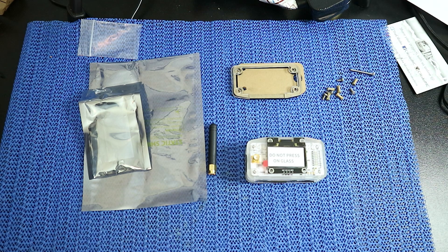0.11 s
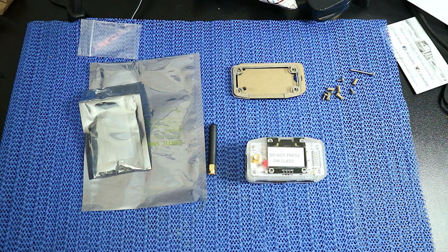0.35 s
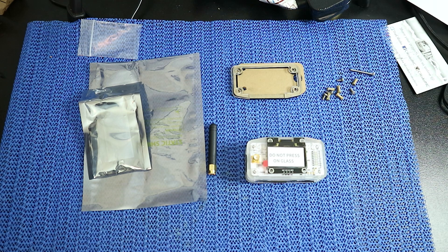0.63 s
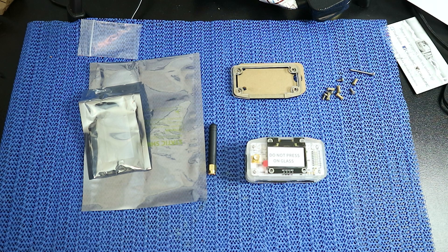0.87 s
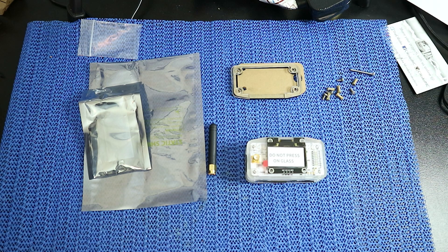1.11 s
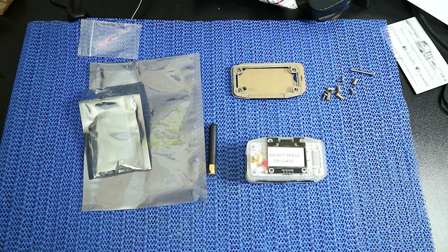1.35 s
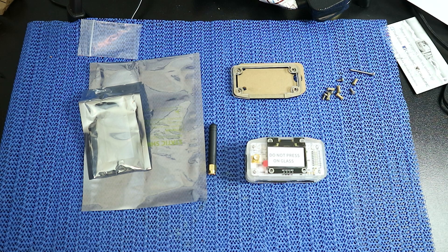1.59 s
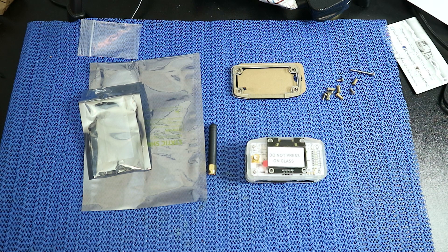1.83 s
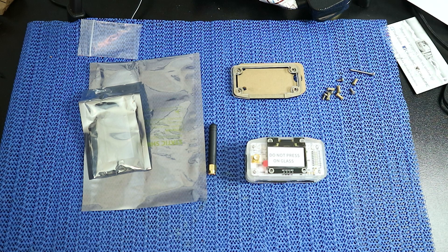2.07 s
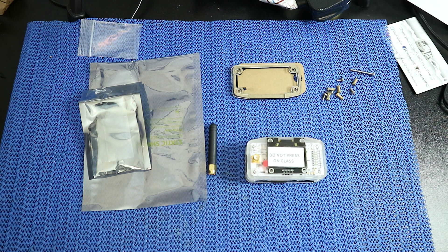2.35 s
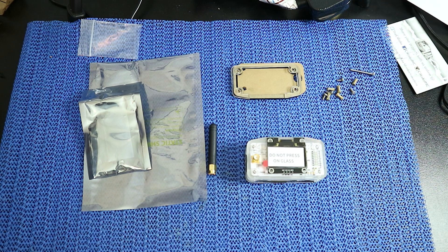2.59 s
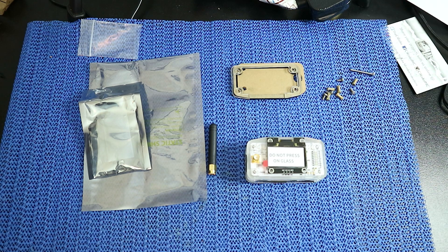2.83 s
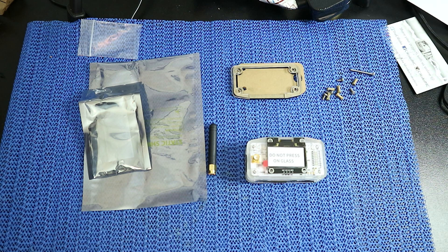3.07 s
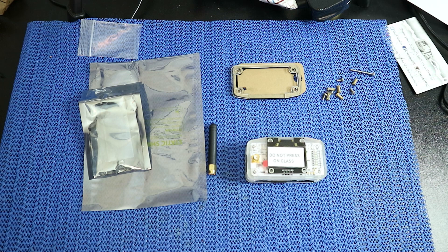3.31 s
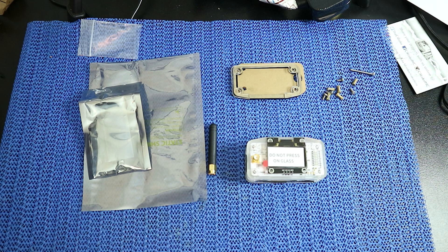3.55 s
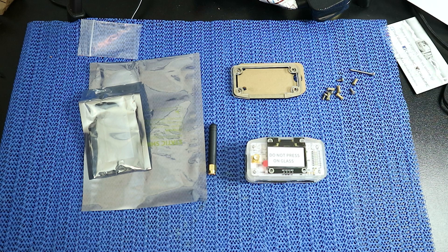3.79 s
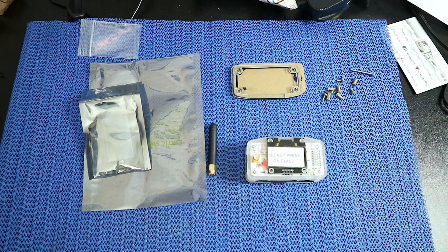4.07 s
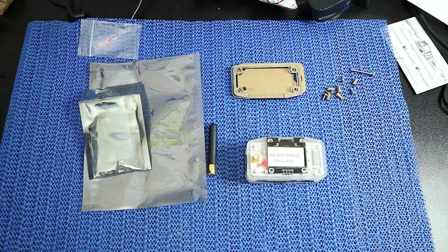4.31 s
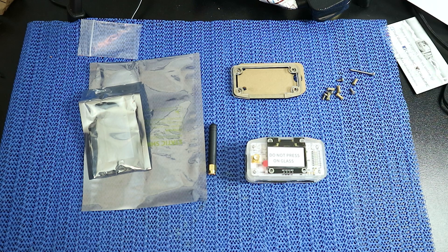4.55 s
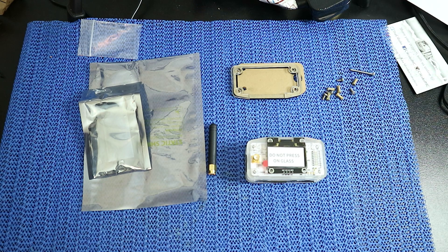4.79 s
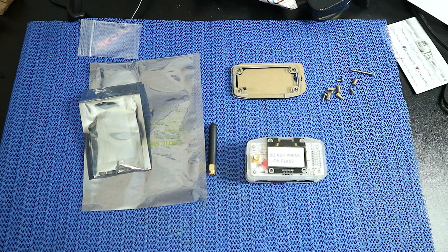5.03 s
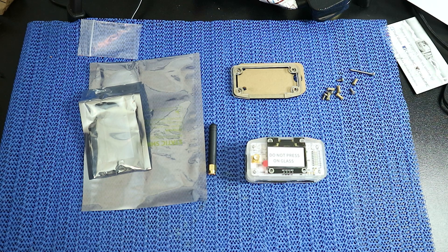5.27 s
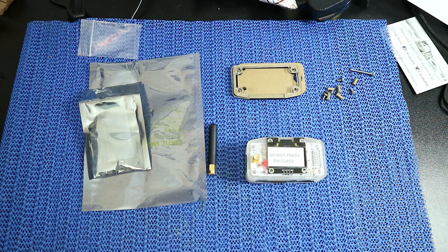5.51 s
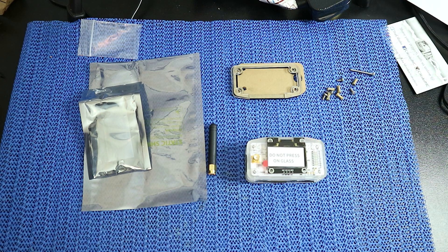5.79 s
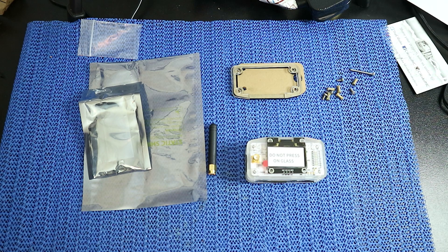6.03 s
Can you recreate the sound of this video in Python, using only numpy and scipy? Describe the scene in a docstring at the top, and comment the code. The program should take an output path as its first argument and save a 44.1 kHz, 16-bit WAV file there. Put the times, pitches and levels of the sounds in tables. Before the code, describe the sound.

Busy rummaging through hard tools and small metal parts, clattering for two seconds, nearly pausing, then knocking and rattling again in a small room.

```python
"""A hand rummages through a drawer of tools a couple of metres away in a small, furnished room.
From the start, mains hum, low rumble and hiss lie under two seconds of busy knocks, ticks and rattle.
Then come faint knocks, and from about 3.5 s the rummaging returns, with a short lull after 4 s, to the end.
Bursts of tiny contacts ring the drawer's modes, and each knock adds a short sine note from the tool.
Decaying noise makes the room's echoes, which blur every blow."""
import sys
import numpy as np
from scipy import signal
from scipy.fft import rfft, irfft, next_fast_len
from scipy.io import wavfile
from scipy.ndimage import uniform_filter1d

SR = 44100
rng = np.random.default_rng(int(sys.argv[2]) if len(sys.argv) > 2 else 0)


def level_to_linear(level):
    """Convert decibel levels to linear amplitude factors, elementwise."""
    exponent = np.asarray(level, float) / 20
    return 10 ** exponent


def transcribe(u):
    """Save the signal u as a 16-bit wav file named by the first command-line argument.

    u: samples, shape (n,) or (channels, n), limited to [-1, 1]; the rate is SR.
    q: integer samples, one column per channel.
    """
    v = np.clip(np.atleast_2d(u).T, -1, 1)
    q = np.round(v * 32767).astype(np.int16)
    wavfile.write(sys.argv[1], SR, q)


N = 270942  # length in samples
SIZE = next_fast_len(N + SR)  # transform length, with room for the tails
HZ = np.arange(SIZE // 2 + 1) * SR / SIZE + 0.00098  # just above zero, so its logarithm exists
TIME = np.arange(N) / SR

# How hard the hand stirs the small parts: start_s [s], stir_db [relative dB]
STIR = [(0.0, -26), (0.22, -59.5), (0.45, -28.5), (0.9, -32.5), (1.18, -41.5), (1.45, -21.5), (1.7, -32),
        (2.0, -39.5), (2.2, -63), (3.44, -78), (3.52, -42.5), (3.95, -41.5), (4.2, -64), (4.46, -24.5),
        (4.86, -58), (5.2, -22), (5.38, -41.5), (5.54, -32), (5.73, -35.5), (6.0, -46), (6.14, -36)]
# The knocks: start_s [s], blow_db [relative dB], thud_db and edge_db [dB relative to the blow],
# pitch_hz of the struck tool [Hz]
KNOCKS = [(0.037, -29, -1, -5.5, 1130), (0.091, -26, -25, -12, 994), (0.122, -28, 0.5, -9.5, 734),
          (0.141, -26.5, -4.5, -6.5, 972), (0.281, -17.5, -10, -3.5, 1210), (0.334, -12.5, -18, -6.5, 2190),
          (0.344, -15.5, -34, -23, 942), (0.469, -17.5, -6.5, -8, 950), (0.488, -21.5, -18, -10, 970),
          (0.551, -14.5, -7, -5.5, 1394), (0.589, -21, -7, -4, 1940), (0.623, -22, -9, -14, 1205),
          (0.653, -6.5, -19, -8.5, 860), (0.665, -14, -43, -6, 790), (0.788, -18.5, -8.5, -7, 1780),
          (0.82, -15.5, -42, -9, 890), (0.883, -14, -8, -6, 887), (0.919, -25, -19, -35, 932),
          (0.984, -28, -25, -21, 1130), (1.038, -29, -34, -4, 1130), (1.143, -35, -10, -17, 700),
          (1.187, -32.5, -9, -5.5, 664), (1.226, -28, -2.5, 1, 1144), (1.25, -19, -4, -4, 1120),
          (1.312, -27, -13.5, -11.5, 970), (1.336, -21, -12, -11, 960), (1.379, -17.5, -9, -10.5, 950),
          (1.41, -12.5, -10, -3.5, 1590), (1.439, -17.5, -11, -13, 1210), (1.504, -7, -8, -5, 1210),
          (1.514, -8.5, -20, -1.5, 1680), (1.582, -11.5, -17, -0.5, 1140), (1.609, -9.5, -32, -8, 1006),
          (1.7, -26, -9, -2, 1050), (1.798, -11, -14.5, -6.5, 1204), (1.837, -20, -30, 0, 1130),
          (1.919, -32, -11, -6.5, 1820), (1.968, -30.5, -25.5, -8, 990), (1.987, -26, -20, -15, 684),
          (2.09, -45, -15, -19, 1530), (2.558, -45.5, -4.5, -19.5, 906), (2.948, -55, -13.5, -14, 660),
          (3.03, -51.5, 0, -14, 1500), (3.07, -54, -13, -19, 960), (3.178, -57, -9, -12.5, 1530),
          (3.219, -54, -6.5, -22, 684), (3.386, -48, -12, -12, 685), (3.473, -35, -7, -20, 950),
          (3.502, -33.5, -4, -10, 950), (3.565, -16, -23, -13, 865), (3.644, -37, 0, -32, 920),
          (3.725, -6, -29, -2.5, 711), (3.8, -11, -48, -10.5, 982), (3.849, -19.5, -45, -9, 948),
          (3.926, -21.5, -46, -15, 955), (4.005, -5, -11.5, -2.5, 2214), (4.044, -17.5, -30, -15, 1020),
          (4.264, -51, -23, -10, 1360), (4.355, -35.5, 0.5, -2.5, 905), (4.394, -31.5, -6, -24, 990),
          (4.436, -15, -9, -5.5, 1710), (4.499, -19, -34, -7.5, 920), (4.558, -28.5, -15, -9, 969),
          (4.645, -14.5, -4.5, -0.5, 1260), (4.654, -18.5, -24, -33, 975), (4.691, -21, -10, 0.5, 1287),
          (4.728, -30, -12, -0.5, 890), (4.897, -36.5, -9, -6.5, 1150), (4.932, -21, -18, -5.5, 1720),
          (4.98, -19.5, -5, 1, 1650), (4.999, -7, -19, -7, 1210), (5.035, -9.5, -8.5, -3.5, 990),
          (5.066, -9, -13, -5, 1065), (5.099, -23, -8, -14, 1130), (5.15, -26.5, -18, -9, 664),
          (5.255, -11.5, -31, -7, 963), (5.421, -22.5, -18, 0, 1620), (5.435, -17.5, -18, -4.5, 652),
          (5.457, -16, -12, -4.5, 1130), (5.499, -25, -5, -11, 1335), (5.564, -30.5, -5.5, -13, 974),
          (5.616, -25, -17, -11, 676), (5.673, -31, -33, -34, 1130), (5.746, -16.5, -30, -7.5, 1130),
          (5.778, -6.5, -10, -4.5, 1210), (5.799, -12.5, -30, 0, 934), (5.826, -6, -26, -4, 1456),
          (5.859, -27, -21, -9, 850), (5.967, -38, 7, -39, 967), (6.033, -17, -6.5, -7, 1150),
          (6.064, -17, -10.5, -3.5, 890), (6.1, -23.5, -11, 0.5, 720)]
# Light parts tapping: start_s [s], level_db [relative dB],
# puff_db of the 9 to 15 kHz noise puff added at each tick [relative dB]
TICKS = [(0.1435, -48, -54), (0.279, -36, -52), (0.3341, -37.5, -58), (0.4637, -41, -51),
         (0.5311, -37.5, -51), (0.5793, -37, -39), (0.6571, -34, -58), (0.7858, -46, -64),
         (0.8355, -42, -47.5), (0.8727, -40, -59), (0.9732, -41, -44), (1.39, -37, -55),
         (1.4009, -30.5, -51), (1.504, -26, -36), (1.577, -32.5, -60.5), (1.7513, -38.5, -49.5),
         (1.7984, -47, -51), (1.8333, -33, -39), (1.9164, -42.5, -62), (3.566, -62, -69),
         (3.6622, -45, -54), (3.725, -27, -37.5), (3.8035, -50, -74), (4.0029, -28.5, -34.5),
         (4.4255, -39.5, -61), (4.4363, -45, -63), (4.4968, -44, -64), (4.558, -43.5, -50),
         (4.6463, -33, -58), (4.6913, -40, -52), (4.9305, -52, -72), (4.9728, -52, -52), (4.9977, -32, -65),
         (5.034, -31.5, -52), (5.0576, -31, -57.5), (5.2215, -50, -69), (5.2495, -38, -60),
         (5.4208, -42, -62), (5.459, -46, -97), (5.7432, -45, -61), (5.772, -27.5, -56.5),
         (6.035, -45.5, -59), (6.0575, -34.5, -67.5), (6.1236, -34.5, -64)]


def over_hz(table):
    """Read a (Hz, value) table at every frequency, on a logarithmic frequency axis."""
    hz, value = np.transpose(table)
    return np.interp(np.log(HZ), np.log(hz), value)


def colour(x, gain):
    """Filter by a complex gain over frequency."""
    return irfft(rfft(x, SIZE) * gain, SIZE)[..., :N]


def causal(db):
    """Minimum-phase gain of a dB response, so nothing sounds before a blow."""
    cepstrum = irfft(np.log(level_to_linear(db)), SIZE)
    cepstrum[1:SIZE // 2] *= 2
    cepstrum[SIZE // 2 + 1:] = 0
    return np.exp(rfft(cepstrum))


def band(x, lo_hz, hi_hz):
    """Butterworth band-pass: keeps what lies between two frequencies."""
    sections = signal.butter(2, [lo_hz, hi_hz], "bandpass", fs=SR, output="sos")
    return signal.sosfilt(sections, x)


def ring(x, hz, t60):
    """One decaying mode that loses 60 dB in t60 seconds; about unit energy for a unit click."""
    r = np.exp(-np.log(1000) / (t60 * SR))
    w = 2 * np.pi * hz / SR
    return signal.lfilter([0, np.sin(w) * np.sqrt(4 * (1 - r))], [1, -2 * r * np.cos(w), r * r], x)


def two_channels(shared, left, right):
    """Left and right: a common sound with a phase difference, plus a part that differs between them."""
    # Sound that the channels do not share: pitch_hz [Hz], level_db [dB relative to all the sound]
    unshared = [(100, -27), (300, -24), (500, -13), (1000, -8.5), (2200, -8), (4400, -2.5), (8000, -2),
                (10500, -8), (12500, -15), (16000, -15)]
    # Phase difference between the channels, left behind right: pitch_hz [Hz], lag [radians],
    # held above 11.5 kHz
    phase_difference = [(800, 0), (3000, .35), (4100, .65), (6100, 1.5), (7600, 1.8), (9500, 2.5),
                        (11500, 3.1)]
    unlike = level_to_linear(over_hz(unshared))
    # each channel takes half of the phase difference, with opposite signs
    turn = np.exp(-1j * over_hz(phase_difference) / 2 * np.array([[1], [-1]]))
    common = colour(shared, turn * np.sqrt(1 - unlike ** 2))
    return common + colour(np.array([left, right]), unlike)


def background():
    """A sine for mains hum that swells and fades, two noise-driven modes for rumble, and steady noise for hiss."""
    # Hum swelling and fading: start_s [s], level_db [dB rms]
    hum_swell = [(0.0, -75), (0.14, -62), (0.24, -76), (1.18, -64), (1.74, -68), (1.85, -57.5), (2.26, -81),
                 (2.96, -63), (3.57, -72), (3.95, -71), (4.38, -72), (5.21, -52.5), (6.02, -55.5),
                 (6.14, -65)]
    # Colour of the hiss: pitch_hz [Hz], level_db [relative dB per Hz]
    hiss_colour = [(12, -35), (20, -8.5), (187, 1), (255, -6.5), (678, -8), (802, -10.5), (2460, -15.5),
                   (7950, -21), (16000, -28.5)]
    hum_level = np.sqrt(2) * level_to_linear(np.interp(TIME, *np.transpose(hum_swell)))
    hum = hum_level * np.sin(2 * np.pi * 60.5 * TIME)

    low = rng.standard_normal((2, N))
    rumble = ring(low[0], 125.7, 0.71) + level_to_linear(-4) * ring(low[1], 174, 0.26)
    # the rumble level is set by a share of the stirring curve, smoothed over 0.13 s
    stir_db = uniform_filter1d(np.interp(TIME, *np.transpose(STIR)), int(0.13 * SR))
    rumble_db = -43 + 0.35 * stir_db
    rumble = rumble / rumble.std() * level_to_linear(rumble_db)

    hiss = colour(rng.standard_normal((3, N)), level_to_linear(over_hz(hiss_colour)))
    hiss_db = -64.5  # rms between 220 Hz and 16 kHz
    hiss = hiss * level_to_linear(hiss_db) / band(hiss[0], 220, 16000).std()
    return hum + rumble + two_channels(*hiss)


def stirring(at_s):
    """Rattle level in relative dB: the hand's stirring plus parts that jump and settle after every knock."""
    s, blow_db = np.transpose(KNOCKS)[:2]
    jump_db, build_up_s, settle_db_per_s = -12.5, 0.014, 449  # jump_db is relative to the blow
    since = np.maximum(at_s[:, None] - s, 0)
    jump = level_to_linear(blow_db + jump_db - settle_db_per_s * since) * (1 - np.exp(-since / build_up_s))
    steady = level_to_linear(np.interp(at_s, *np.transpose(STIR)))
    return 10 * np.log10(steady ** 2 + np.sum(jump ** 2, axis=1))


def rattle():
    """A dense scatter of 1600 small contacts, at random moments, that follows the hand's stirring."""
    at_s = rng.random(1600) * N / SR
    sizes_db = 2.2 * rng.exponential(size=len(at_s))
    body = stirring(at_s) + 9.66 + sizes_db
    edge = body - 5
    # start, spread in seconds, then thud, body, edge and tick levels
    return [at_s, 0 * at_s + .001, body - 8, body, edge, edge - 16]


def contacts(at_s, spread_s, count):
    """Sample places and signed sizes of the contacts in each blow: a light first touch, then the weight lands."""
    chance = rng.random((len(at_s), count, 2))
    late = -spread_s * np.log(1 - chance[..., 0])
    late[:, 0] = 0
    centred = chance[..., 1] - .5
    size = np.sign(centred) * (0.71 + np.abs(centred)) / np.sqrt(count)
    size[:, 0] *= level_to_linear(-5.0)
    place = np.clip(((at_s[:, None] + late) * SR).astype(int), 0, N - 1)
    return place, size


def train(place, size, db):
    """Clicks at the given places, each blow at its own level."""
    return np.bincount(place.ravel(), (size * level_to_linear(db)[:, None]).ravel(), N)


def crack_bands():
    """The colour of a blow cut into thud, body, edge and tick, each of unit energy."""
    # Colour of a blow: pitch_hz [Hz], level_db [relative dB per Hz]
    blow_colour = [(60, -40.5), (100, -17.5), (200, -17), (400, -16), (520, 0), (620, -5), (1000, -5.5),
                   (1600, -8), (2500, -1.5), (4000, -6), (6500, -15), (10000, -19.5), (14000, -29.5),
                   (16500, -49)]
    # Borders of thud, body, edge and tick: pitch_hz [Hz]
    borders_hz = [95, 650, 1700, 6000, 17000]
    gains = []
    for lo, hi in zip(borders_hz, borders_hz[1:]):
        skirt_db = -10 * np.log10((1 + (lo / HZ) ** 8) * (1 + (HZ / hi) ** 8))
        gain = causal(over_hz(blow_colour) + np.maximum(skirt_db, -90))
        gains.append(gain / np.sqrt(np.mean(np.abs(gain) ** 2)))
    return gains


def strike(at_s, spread_s, thud_db, body_db, edge_db, tick_db, drawer_db):
    """Clicks make a broad crack in four bands and ring the drawer's modes, a little differently each time."""
    # The drawer's modes: pitch_hz [Hz], level_db [relative dB], t60_s, the time to fall 60 dB [s]
    drawer_modes = [(126, -13, 0.54), (186, -23, 0.22), (226, -17, .25), (365, -25, .2), (497, -13.5, 0.36),
                    (505, 9, 0.2), (510, 3, 0.2), (674.6, 1, 0.086), (782, -6.5, 0.23), (852, -5, 0.18),
                    (969, 3.5, 0.16), (1130, -7.5, 0.17), (1210, -9.5, 0.192), (1255, -10.5, 0.303),
                    (1500, -28, 0.3), (1590, -6, 0.067), (1690, 0, 0.045), (1812, -13, 0.04),
                    (2040, -13.5, 0.041), (2300, -15.5, 0.099), (2435, -5, 0.029), (3233, -1, 0.019),
                    (3930, -28.5, 0.038)]
    place, size = contacts(at_s, spread_s[:, None], count=8)
    clicks = [train(place, size, db) for db in (thud_db, body_db, edge_db, tick_db)]
    crack = colour(np.array(clicks), np.array(crack_bands())).sum(axis=0)

    scatter_db = 2.0 * rng.standard_normal((len(at_s), len(drawer_modes)))
    drawer = np.zeros(N)
    for k, (hz, mode_db, t60) in enumerate(drawer_modes):
        # low modes follow the thud, middle ones the body, high ones the edge
        push_db = thud_db if hz < 650 else body_db if hz < 1750 else edge_db
        push = train(place, size, push_db + scatter_db[:, k])
        drawer += level_to_linear(mode_db) * ring(push, hz, t60)
    return crack + level_to_linear(drawer_db) * drawer


def echo(rise_s, count):
    """Room tails: octave-wide bands of noise that build up quickly and die at their own rates."""
    # How long echoes last: pitch_hz [Hz], t60_s, the time to fall 60 dB [s]
    room_fall = [(150, 0.48), (400, 0.26), (1000, 0.21), (3000, 0.22), (8000, 0.24), (16000, 0.37)]
    t = np.arange(SR // 2) / SR
    hz, t60 = np.transpose(room_fall)
    edges = np.geomspace(40, 20000, 10)
    tail = np.zeros((count, len(t)))
    for lo, hi in zip(edges, edges[1:]):
        band_t60 = np.interp(np.log(lo * hi) / 2, np.log(hz), t60)
        tail += band(rng.standard_normal((count, len(t))), lo, hi) * level_to_linear(-60 * t / band_t60)
    tail = tail * (1 - np.exp(-t / rise_s))
    return rfft(tail / np.sqrt(np.sum(tail ** 2, axis=1, keepdims=True)), SIZE)


def room(dry, hold_s, count):
    """The hand keeps moving: every hold_s the sound fades over to the next of a few spots with own echoes."""
    spot = (TIME / hold_s).astype(int) % count
    here = (spot == np.arange(count)[:, None]) * 1.
    share = uniform_filter1d(here, int(hold_s * SR / 2), axis=1)
    parts = rfft(dry * share, SIZE)
    fields = []
    for _ in range(3):  # one field shared by both channels, one for the left, one for the right
        tails = echo(rise_s=0.00092, count=count)
        fields.append(irfft(np.sum(parts * tails, axis=0), SIZE)[:N])
    return fields


def knocks():
    """The blows one can point at; the harder the edge, the brighter the tick."""
    s, blow_db, thud_db, edge_db = np.transpose(KNOCKS)[:4]
    body = blow_db + 20.5
    return [s, 0 * s + .005, body + thud_db, body, body + edge_db, body + 7.5 * edge_db - 12.0]


def tools(at_s, note_db, hz, t60):
    """The struck tool gives one short note of its own: a sine that falls 60 dB in t60 seconds."""
    out = np.zeros(N + SR)
    t = np.arange(int(.12 * SR)) / SR
    for s, db, f in zip(at_s, note_db, hz):
        start = int(s * SR)
        out[start:start + len(t)] += level_to_linear(db - 60 * t / t60) * np.sin(2 * np.pi * f * t)
    return out[:N]


def ticks():
    """Screws and bits tap each other: too light to move the drawer much, nearly all edge and tick."""
    s, db, _ = np.transpose(TICKS)
    tick = db + 28.5
    return [s, 0 * s + .001, tick - 40, tick - 15, tick - 3, tick]


def treble_puffs(t60):
    """A puff of 9 to 15 kHz noise laid over each tick, fading 60 dB in t60 seconds, same in both channels."""
    s, _, puff_db = np.transpose(TICKS)
    starts = np.bincount((s * SR).astype(int), level_to_linear(puff_db), N)
    fade = signal.lfilter([1], [1, -level_to_linear(-60 / (t60 * SR))], starts)
    noise = fade * rng.standard_normal(N)
    return level_to_linear(4.0) * band(band(noise, 9000, 14730), 9000, 14730)


def scene():
    """Knocks, ticks and rattle heard directly and through the room, slightly louder on the left."""
    s, blow_db, _, edge_db, hz = np.transpose(KNOCKS)
    # duller and lighter blows leave more of the tool's note, relative to the blow
    ring_db = -9.5 - 0.23 * edge_db - 0.1 * blow_db
    note = tools(s, blow_db + ring_db, hz, t60=0.061)
    blows = np.hstack([knocks(), ticks(), rattle()])
    dry = strike(*blows, drawer_db=-15) + note
    dry = band(band(dry, 93, 21000), 82, 20000)  # the knocks, ticks and rattle lose everything below about 90 Hz
    shared, left, right = room(dry, hold_s=.03, count=5)
    direct = level_to_linear(-4.5) * dry + level_to_linear(-13) * note
    near = two_channels(direct + shared, left, right) + treble_puffs(t60=.11)
    lean_db = np.array([[.35], [-.35]])  # left, right
    return near * level_to_linear(lean_db) + background()


def top_cut(x):
    """Nothing passes above the cut-off."""
    return signal.sosfilt(signal.butter(12, 16380, fs=SR, output="sos"), x)


def record(dry):
    """Hand on the finished mix of both channels."""
    return top_cut(dry)


dry = scene()
out = record(dry)
transcribe(out)
```